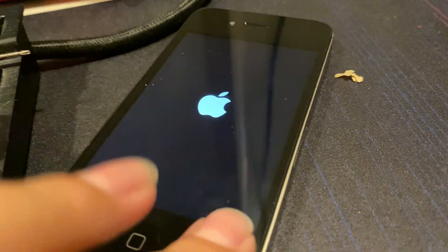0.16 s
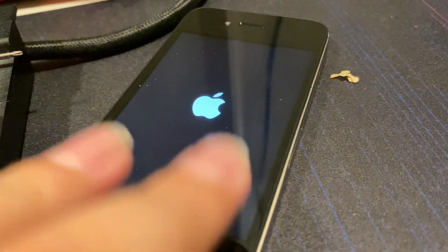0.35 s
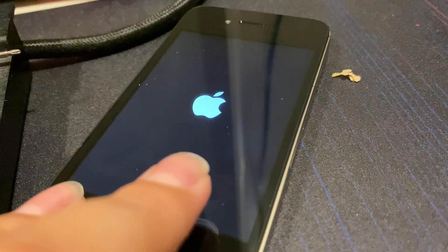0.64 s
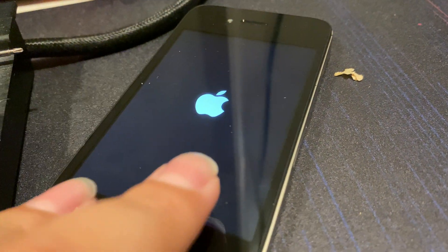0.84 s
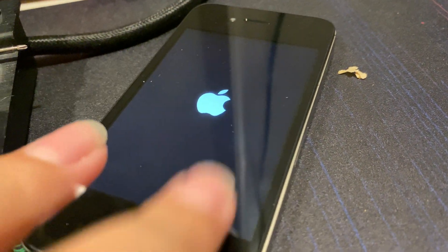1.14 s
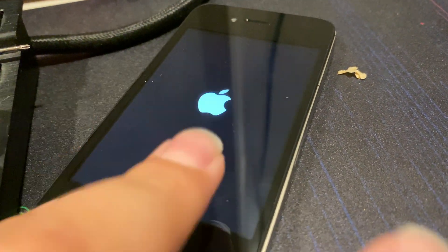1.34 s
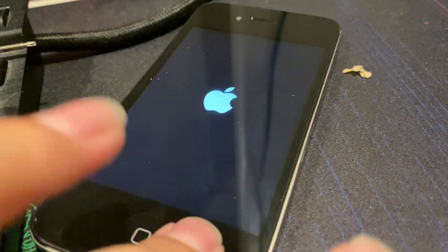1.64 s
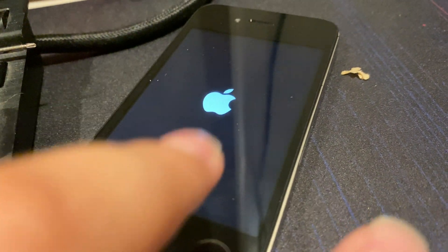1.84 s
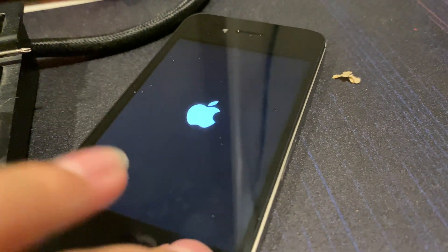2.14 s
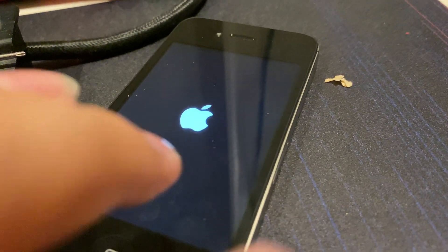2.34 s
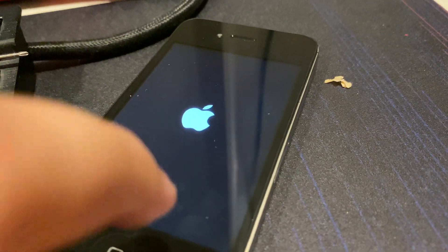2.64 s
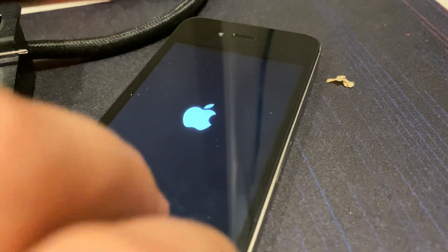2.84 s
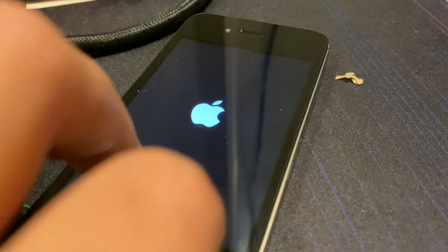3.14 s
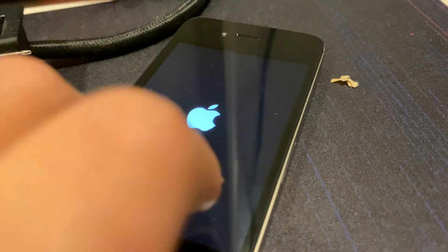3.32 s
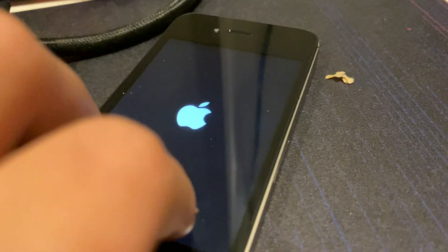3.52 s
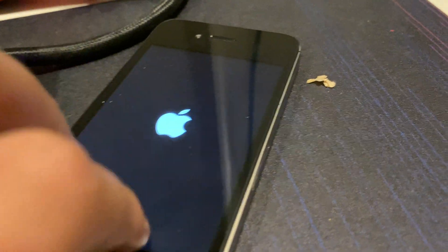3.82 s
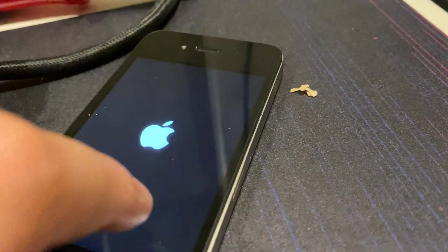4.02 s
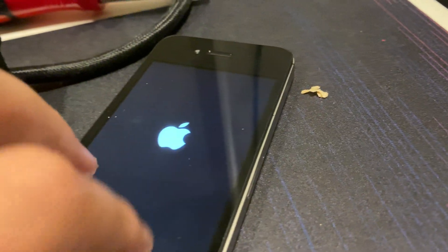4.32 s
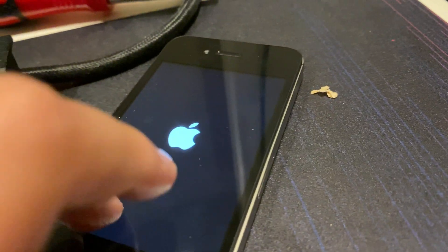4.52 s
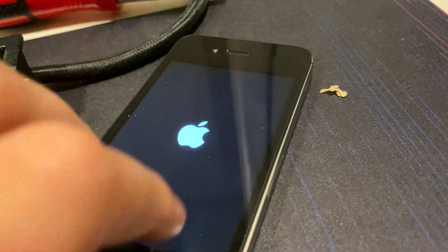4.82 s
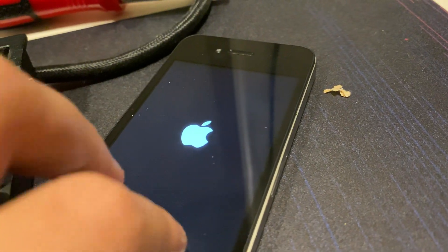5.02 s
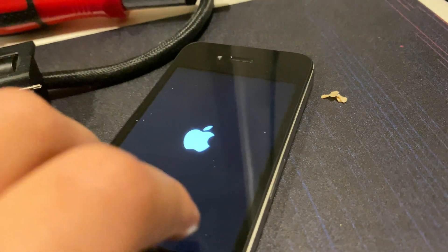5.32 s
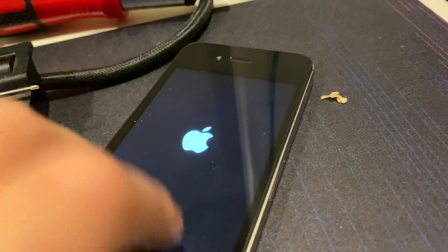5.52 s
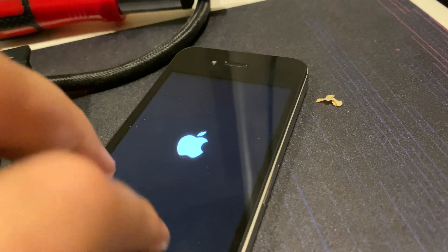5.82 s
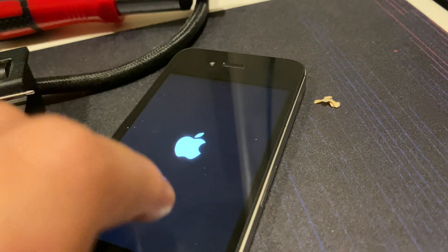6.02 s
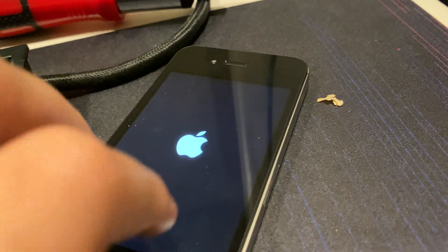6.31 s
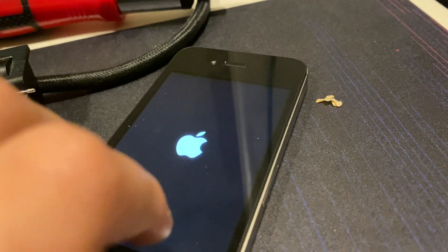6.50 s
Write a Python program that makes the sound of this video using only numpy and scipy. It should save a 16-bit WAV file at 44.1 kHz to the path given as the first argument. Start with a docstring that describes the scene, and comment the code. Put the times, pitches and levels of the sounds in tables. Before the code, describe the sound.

The low hush of a small quiet room runs throughout, and everything is heard close up in stereo. From 0.2 seconds, finger pads thud softly and irregularly on the glass of a phone lying on a desk. A nail grazes the case with a sharp little click at 0.6 seconds, and more faintly afterwards. Near 2 seconds skin sticks and slips across the glass in a short judder, followed by a firmer thud. From about 2.5 seconds a fingernail taps the screen repeatedly, roughly five times a second and slightly unevenly, louder from 3 seconds. Each tap is a crisp click with a very brief ring, a small desk knock and a soft low rumble. The moving hand rustles faintly. A heavier thud with a short rub comes at 5.9 seconds, and the taps continue until about 6.7 seconds. The walls echo slightly.

```python
"""First comes the hush of a small quiet room, then soft touches on a phone lying on a desk, heard close up.
Nails graze the case and make it ring, finger pads thud on the glass, and skin sticks and slips across it,
once with a clear judder. From about 2.5 s a nail taps again and again: each tap clicks and rings the
phone, which bottoms out a few milliseconds later and knocks the desk. The moving hand rustles, a low
rumble swells with the taps, and the walls echo faintly. Left and right are two nearby microphone ports."""
import sys
import numpy as np
from scipy import signal
from scipy.fft import rfft, irfft, next_fast_len
from scipy.io import wavfile
from scipy.ndimage import uniform_filter1d

SR = 44100
rng = np.random.default_rng(int(sys.argv[2]) if len(sys.argv) > 2 else 0)


def log_audio(samples):
    """Write samples as a 16-bit WAV file to the path given in sys.argv[1]."""
    # one column per channel
    frames = np.atleast_2d(samples).T
    # limit to full scale, then quantise
    limited = np.clip(frames, -1, 1)
    pcm = np.round(limited * 32767).astype(np.int16)
    wavfile.write(sys.argv[1], SR, pcm)


N = 293706

# Tone of the room's hush, the rumble, the hand's rustle and a lifting finger: pitch_hz, level_db
HUSH_TONE = [(15, -52), (25, -26), (44, -1), (120, -2.5), (180, -18), (263, -6.5), (293, -11.5),
             (354, -13.5), (607, -16), (695, -28.5), (818, -24), (1480, -42.5), (5280, -43), (9320, -51),
             (13000, -56), (16000, -66)]
RUMBLE_TONE = [(15, -49), (28, -17.5), (48, 0.5), (90, 2), (140, -4.5), (300, -6.5), (1000, -47)]
RUSTLE_TONE = [(100, -1), (350, 18), (1000, 21), (2000, 14), (3000, 8), (5000, 5.5), (9000, -14),
               (11300, -10), (13000, -20), (16000, -16)]
LIFT_TONE = [(1000, -36), (3000, -9), (4700, 22), (6500, -6), (9000, -34), (11300, -7), (13000, -19)]
# How alike those noises are left and right (1 is the same): pitch_hz, likeness
NOISE_LIKENESS = [(60, .7), (180, 0.65), (550, 0), (5000, 0.01)]
# Rise and fall of the rumble and the rustle, before scaling: time_s, level_db
RUMBLE_CURVE = [(0.0, -64), (1.67, -66), (1.82, -52.5), (2.24, -64), (3.36, -59.5), (3.89, -64),
                (4.17, -59.5), (6.42, -61), (6.66, -52)]
RUSTLE_CURVE = [(0.0, -84), (1.69, -82), (1.98, -71), (2.61, -83), (3.21, -73), (3.65, -79.5), (4.8, -84),
                (5.29, -71), (5.66, -70), (5.9, -64.5), (6.27, -80.5), (6.66, -70)]
# Light grazes of a nail: start_s, level_db, treble_db
GRAZES = [(0.203, -75, 14), (0.6212, -33, 2.5), (0.634, -38.5, -6), (0.751, -54.5, -44), (1.013, -75, 14),
          (1.6636, -47.5, -34), (1.8613, -58, -7), (1.8902, -62, -38), (2.073, -56.5, -82)]
# Finger pad presses: start_s, level_db, contact_s, pitch_hz
PRESSES = [(0.207, -46, 0.0029, 137), (0.632, -44, 0.0028, 100), (1.016, -46.5, 0.0048, 88.5),
           (1.354, -47.5, 0.002, 110), (1.635, -39.5, 0.0044, 88.5), (1.865, -43.5, 0.00093, 221),
           (2.163, -31.5, 0.0031, 82), (2.488, -40.5, 0.0028, 109), (2.715, -42, 0.0047, 101),
           (3.197, -34, 0.0026, 100), (4.104, -36.5, 0.0063, 62.6), (5.893, -29.5, 0.0042, 128)]
# Skin skidding on glass: middle_s, half_length_s, level_db, slips_per_s, treble_db
SKIDS = [(0.899, 0.035, -65.5, 310, 9), (1.122, 0.022, -58, 250, -20), (1.964, 0.03, -37, 252, -12),
         (3.127, 0.017, -61.5, 540, 8), (3.522, 0.035, -70.5, 400, 47), (4.67, 0.019, -75, 530, 53),
         (5.68, 0.037, -75, 440, 18), (5.9, 0.021, -44.5, 490, -1.5), (6.568, 0.013, -56, 450, 24)]
# Nail taps: start_s, strength_db, treble_db, phone_ring_db
TAPS = [(2.4846, -47, -17, -37.5), (2.712, -45.5, -12, -38), (2.9505, -31, -11, -34),
        (3.1943, -32, -7, -20), (3.2909, -32.5, -12, -27), (3.5664, -31.5, -6, -26.5),
        (3.6545, -35.5, -13, -33), (3.8717, -32, -6, -28), (4.08, -33, -14, -35), (4.302, -31.5, -4, -27),
        (4.505, -34.5, -13, -41), (4.7249, -33.5, -4, -30.5), (4.933, -35.5, -13.5, -42),
        (5.0297, -33, -2.5, -29.5), (5.1379, -32.5, -10.5, -45), (5.2436, -33, -4, -29.5),
        (5.3495, -28.5, -10.5, -33), (5.4308, -31, 0, -25), (5.558, -30, -12, -31),
        (5.7627, -28, -6.5, -22.5), (6.0063, -29.5, -13, -39), (6.222, -30.5, -4.5, -31),
        (6.424, -30.5, -13, -34), (6.649, -37.5, -4.5, -54)]
# Tone of a nail and of skin on glass: pitch_hz, level_db
CLICK_TONE = [(300, -11.5), (1400, 0.5), (2300, -4.5), (3000, -4), (4600, 0.7), (7000, 3), (8300, -8.5),
              (9500, -1.5), (11300, -0.5), (16000, -7)]
SKIN_TONE = [(100, -11), (250, 7.5), (450, 1), (800, -6.5), (1300, -15), (2500, -25), (5000, -33),
             (8000, -38), (14000, -48.5)]
# Notes of the case edge, desk top, screen and phone body: pitch_hz, fade_s, left_db, right_db
# (fade_s is the time a sound takes to drop by 60 dB)
CASE_NOTES = [(1830, 0.015, -27, -22), (2730, .008, -2, 2), (3550, 0.0098, 4, -6), (5300, .008, -11, -4)]
DESK_NOTES = [(79.1, 0.8, -27.5, -40.5), (141.3, 0.21, -29, -27.5), (201.8, 0.15, -15, -24.5),
              (242, 0.16, -7.5, -13.5), (303.4, 0.34, -30.5, -23), (316, 0.021, -1.5, -10.5),
              (325, 0.12, -22.5, -22), (377, 0.24, -21.5, -25), (408, 0.14, -18, -47),
              (564.3, 0.089, -13, -37), (590, 0.0055, -3.5, -51), (720, 0.3, -31, -53),
              (860, 0.36, -23, -32.5)]
GLASS_NOTES = [(1310, 0.015, -11, -4), (1770, 0.015, -9.5, -14), (2350, 0.011, -9, -12),
               (3617, 0.022, -15, -13), (4390, 0.016, 4, 1.5), (4620, 0.015, 0, -3.5),
               (5670, 0.0048, -31, -32), (6400, 0.0088, -35, -30), (10960, 0.0038, -15, -10)]
PHONE_NOTES = [(1003, 0.035, -2.5, -15.5), (1062, 0.034, -8.5, -12.5), (1236, 0.13, -26, -55),
               (1820, 0.011, -14, -41)]
# The ports face different parts of a vibration, so they hear it out of step: pitch_hz, phase_radians
PORT_PHASE = [(250, -0.19), (420, -0.36), (600, -0.5), (1000, 2.5), (1800, 1.33)]
# How long the room rings: pitch_hz, fade_s
ROOM_FADE = [(100, 0.3), (400, 0.58), (1000, 0.2461), (4000, 0.213), (8000, 0.3), (15000, 0.29)]
# Tone of the room's ring: pitch_hz, level_db
ROOM_TONE = [(60, -0.5), (250, -6), (450, -3), (750, 4.5), (1100, -1), (2000, 4.5), (5000, -0.5),
             (9000, -6.5), (11300, -8), (13200, -22), (15000, -9)]

RIGHT_LEAD_S = .000266  # sound reaches the right port first


def amp(db):
    """Turn decibels into a number to multiply by."""
    return 10 ** (np.asarray(db) / 20)


def unit(x):
    """Scale x to an average (rms) level of 1."""
    return x / np.sqrt(np.mean(x ** 2) + 1e-20)


def along(points, hz):
    """Read between (pitch_hz, value) points on a log pitch scale."""
    pitches, values = np.transpose(points)
    return np.interp(np.log(hz + 1), np.log(pitches + 1), values)


def add(track, start_s, sound):
    """Mix a sound into a track."""
    start = max(round(start_s * SR), 0)
    part = sound[..., :max(N - start, 0)]
    track[..., start:start + part.shape[-1]] += part


def filtered(x, response):
    """Multiply each frequency in x by response(hz)."""
    size = next_fast_len(x.shape[-1] + SR // 10)
    return irfft(rfft(x, size) * response(np.fft.rfftfreq(size, 1 / SR)), size)[..., :x.shape[-1]]


def impulse(tone_db, size=512):
    """A tick of energy 1 with the given tone, packed toward its start."""
    cepstrum = irfft(np.log(amp(tone_db(np.fft.rfftfreq(size, 1 / SR)))))
    cepstrum[1:size // 2] *= 2
    cepstrum[size // 2 + 1:] = 0
    tick = irfft(np.exp(rfft(cepstrum)))
    return tick / np.linalg.norm(tick)


def with_room_row(pair):
    """Give left and right a third row: the sound that goes out into the room."""
    return np.vstack([pair, pair.mean(0)])


def noise(tone):
    """Steady stereo noise with the given tone; its lows are partly alike left and right."""
    def response(hz):
        spread = np.arccos(np.clip(along(NOISE_LIKENESS, hz), -1, 1)) / 2
        return amp(along(tone, hz)) * [np.cos(spread), np.sin(spread)]
    mid, side = filtered(rng.standard_normal((2, N)), response)
    return unit(np.array([mid + side, mid - side]))


def patchy(x, depth_db=3.0):
    """Let the level drift in separate patches of time and pitch."""
    spectrum = signal.stft(x, nperseg=512)[2]
    drift = uniform_filter1d(rng.standard_normal(spectrum.shape[1:]), size=12, axis=0)
    drift = uniform_filter1d(drift, size=24, axis=1)
    return unit(signal.istft(spectrum * amp(depth_db * unit(drift)), nperseg=512)[1][:, :N])


def background(jolt_s=0.071, swing_lead_s=.03, lift_lag_s=0.042, half_length_s=0.094):
    """The room hushes, a rumble follows each tap, the hand rustles down and skin hisses as it lifts."""
    t = np.arange(N) / SR
    jolts, swings, lifts = np.zeros((3, N))
    for start_s, db, *_ in TAPS:
        age = t - start_s
        jolts += amp(db - 20) * (age > 0) * np.exp(-np.abs(age) / jolt_s)
        swings += amp(db - 51) * np.exp(-((age + swing_lead_s) / half_length_s) ** 2)
        lifts += amp(db - 49) * np.exp(-((age - lift_lag_s) / half_length_s) ** 2)
    shake = amp(np.interp(t, *np.transpose(RUMBLE_CURVE)) - 1.0)
    stir_db = np.interp(t, *np.transpose(RUSTLE_CURVE))
    stir = amp(4.0 + stir_db.max() + 1.21 * (stir_db - stir_db.max()))  # deepens the quiet parts
    hush = amp(-61.5) * noise(HUSH_TONE) * amp([[1.5], [-1.5]])
    rumble = np.hypot(shake, jolts) * noise(RUMBLE_TONE)
    rustle = np.hypot(stir, swings) * patchy(noise(RUSTLE_TONE))
    hiss = lifts * patchy(noise(LIFT_TONE))
    return hush + rumble * amp([[.4], [-.4]]) + (rustle + hiss) * amp([[1.3], [-1.3]])


def bending(hz, travel_s):
    """A wave bends its way through a plate: highs run ahead, and 1 kHz arrives after travel_s."""
    return np.exp(-4j * np.pi * travel_s * np.sqrt(1000 * hz))


def click(treble_db, crunch_s, rough, width, travel_s, left_db):
    """A nail's snap spreads through the glass with a brief crunch. Rows: left, right, room."""
    t = np.arange(SR // 50) / SR
    snap = filtered(1. * (t == 0), lambda hz: bending(hz, travel_s))
    crunches = rng.standard_normal((2, len(t))) * t * np.exp(-t / crunch_s)
    shared, side = [crunch / np.linalg.norm(crunch) for crunch in crunches]
    side = filtered(side, lambda hz: along([(1000, 0.81), (6000, 1.0), (10000, 0.56)], hz))
    mid = snap + rough * shared
    pair = np.array([mid + width * side, mid - width * side])
    bursts = np.vstack([pair * np.sqrt(2) / np.linalg.norm(pair), snap]) * np.sqrt(SR / 300)
    treble_share = [(3500, 0.0092), (11000, 0.99)]
    tick = impulse(lambda hz: along(CLICK_TONE, hz) + treble_db * along(treble_share, hz))
    left, right, outgoing = signal.fftconvolve(bursts, tick[None], axes=1)
    late_left = filtered(left, lambda hz: np.exp(-2j * np.pi * hz * RIGHT_LEAD_S))
    return np.array([amp(left_db) * late_left, right, outgoing])


def ring(notes, scatter_db, detune=0.015, hold_s=1):
    """A struck object rings a little differently each time; the finger damps it over about hold_s."""
    t = np.arange(SR // 6) / SR
    hz, fade_s, left_db, right_db = np.transpose(notes)
    level, shift = rng.standard_normal((2, len(hz)))
    phase = 2 * np.pi * (hz * (1 + detune * shift))[:, None] * t
    ahead = (2 * np.pi * hz * RIGHT_LEAD_S + along(PORT_PHASE, hz))[:, None]
    fade = amp(scatter_db * level[:, None] - 60 * t / fade_s[:, None]) * np.exp(-(t / hold_s) ** 2)
    left = amp(left_db) @ (fade * np.cos(phase))
    right = amp(right_db) @ (fade * np.cos(phase + ahead))
    return np.array([left, right])


def pressed(x, contact_s):
    """Drive x with a smooth push: longer contact sounds duller."""
    push = np.sin(np.pi * np.minimum(np.arange(SR // 20) / SR / contact_s, 1)) ** 2
    return signal.fftconvolve(x, push[None] / push.sum(), axes=1)


def nail_grazes(skitter_s=.009, skitter_db=-17):
    """A nail skitters over the case edge in three quick clicks and rings it without moving the phone."""
    out = np.zeros((3, N))
    for start_s, db, treble_db in GRAZES:
        for offset_s, offset_db in [(-skitter_s, skitter_db), (0, 0), (skitter_s, skitter_db)]:
            brush = click(treble_db, crunch_s=.002, rough=.99, width=.62, travel_s=.001564, left_db=4)
            add(out, start_s + offset_s, amp(db + offset_db - 4.5) * brush)
        case = pressed(ring(CASE_NOTES, scatter_db=4), contact_s=0.0003)
        add(out, start_s + 0.00102, amp(db - 5) * with_room_row(case))
    return out


def thud(contact_s, pitch_hz, travel_s=0.00201, damping=0.24):
    """A soft push crosses the desk as a dull thud of falling pitch and barely rings it."""
    def sway(hz):
        friction = 1j * hz * pitch_hz * damping
        return friction / (pitch_hz ** 2 - hz ** 2 + friction)
    wave = filtered(signal.unit_impulse(SR // 6), lambda hz: sway(hz) * bending(hz, travel_s))
    desk = amp(-43.5) * ring(DESK_NOTES, scatter_db=7.5, hold_s=0.095)
    pair = pressed(wave * amp([[1], [-1]]) + desk, contact_s)
    return with_room_row(pair / np.abs(pair).max())


def pad_presses(gain_db=2.5, settle_s=0.0246, settle_db=-12.5):
    """A finger pad thuds on the glass; its weight then settles with a weaker, slower, lower thud."""
    out = np.zeros((3, N))
    for start_s, db, contact_s, pitch_hz in PRESSES:
        add(out, start_s, amp(db + gain_db) * thud(contact_s, pitch_hz))
        settle = thud(contact_s * 2.2, pitch_hz * 0.73)
        add(out, start_s + settle_s, amp(db + gain_db + settle_db) * settle)
    return out


def room_ring(x, early_db=9.5, early_s=0.0031, stretches=12):
    """Near objects scatter the sound, then the walls' ring fades; each stretch gets a new random pattern."""
    out = np.zeros((2, N))
    for part in np.array_split(np.arange(N), stretches):
        hz, t, spectrum = signal.stft(rng.standard_normal((2, SR // 2)), SR, nperseg=256)
        fade = amp(-60 * t / along(ROOM_FADE, hz)[:, None])
        tail = signal.istft(spectrum * fade * amp(along(ROOM_TONE, hz))[:, None], SR, nperseg=256)[1]
        age = np.arange(tail.shape[1]) / SR
        early_boost = 1 + amp(early_db) * np.exp(-age / early_s)
        fade_in = 1 - np.exp(-age / .001)
        tail = tail * early_boost * fade_in / np.sqrt(SR / 50)
        add(out, part[0] / SR, signal.fftconvolve(x[:, part], tail, axes=1))
    return out


def wall_echo(x, delay_s=.03, dull_hz=700):
    """One dull echo from the nearest wall."""
    return filtered(x, lambda hz: np.exp(-2j * np.pi * hz * delay_s) / (1 + 1j * hz / dull_hz) ** 2)


def skin_skids(jitter=0.23):
    """Skin sticks and slips on the glass at an uneven rate; dry skin rasps brighter."""
    out = np.zeros(N)
    t = np.arange(SR // 4) / SR
    treble_share = [(600, 0.22), (2500, 0.84)]
    for middle_s, half_length_s, db, slips_per_s, treble_db in SKIDS:
        skin = impulse(lambda hz: along(SKIN_TONE, hz) + treble_db * along(treble_share, hz), size=2048)
        slip_times = np.cumsum(np.exp(jitter * rng.standard_normal(len(t) // 100)) / slips_per_s)
        slips = np.bincount((slip_times * SR).astype(int), minlength=len(t))[:len(t)]
        rubbing = unit(slips - slips.mean()) + rng.standard_normal(len(t))
        judder = unit(signal.fftconvolve(rubbing, skin)[:len(t)])
        swell = np.exp(-((t - t.mean()) / half_length_s) ** 2)
        add(out, middle_s - t.mean(), amp(db) * judder * swell)
    return with_room_row(out * amp([[1.5], [-3]]))


def desk_knock(travel_s):
    """The phone bottoms out, and its knock spreads through the desk top."""
    desk = pressed(ring(DESK_NOTES, scatter_db=2, detune=0.018, hold_s=0.086), contact_s=0.0011)
    knock = filtered(desk, lambda hz: bending(hz, travel_s))
    return -with_room_row(knock * amp([[-.3], [.6]]))


def nail_taps(usual_db=-32, usual_treble_db=-7, desk_travel_s=0.00033):
    """A nail clicks and rings glass and phone; the knock follows, sooner and louder for a harder tap."""
    out = np.zeros((3, N))
    for start_s, db, treble_db, phone_db in TAPS:
        harder_db, brighter_db = db - usual_db, treble_db - usual_treble_db
        nail = click(brighter_db, crunch_s=.0007, rough=1, width=.46, travel_s=.001288, left_db=1)
        add(out, start_s - .0005, amp(db - 3) * nail)
        glass = pressed(ring(GLASS_NOTES, scatter_db=0.5, detune=0.014), contact_s=.0001)
        add(out[:2], start_s + 0.00022, amp(db - 6) * glass)
        phone = pressed(ring(PHONE_NOTES, scatter_db=5), contact_s=0.00064)
        add(out, start_s, amp(phone_db - 5) * with_room_row(phone))
        knock_db = -23 + 0.84 * harder_db - 0.23 * brighter_db  # brighter: more nail, less weight
        delay_s = .00405 - .00006 * harder_db
        add(out, start_s + delay_s - desk_travel_s, amp(knock_db) * desk_knock(desk_travel_s))
    return out


def scene():
    """All the touches and their echoes, over the background."""
    touches = nail_taps() + pad_presses() + nail_grazes() + skin_skids()
    direct, outgoing = touches[:2], touches[2:]
    return direct + amp(-13.5) * wall_echo(outgoing) + amp(-10) * room_ring(outgoing) + background()


def record(dry, top_hz=16300):
    """Cut the treble steeply above top_hz."""
    return filtered(dry, lambda hz: 1 / np.sqrt(1 + (hz / top_hz) ** 160))


dry = scene()
out = record(dry)
log_audio(out)
```